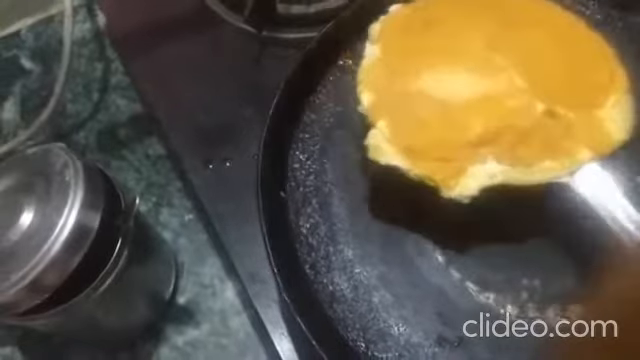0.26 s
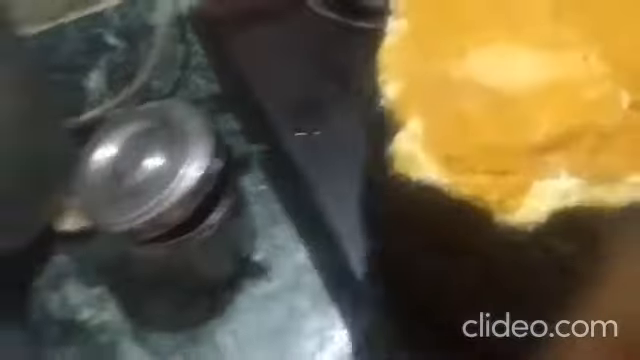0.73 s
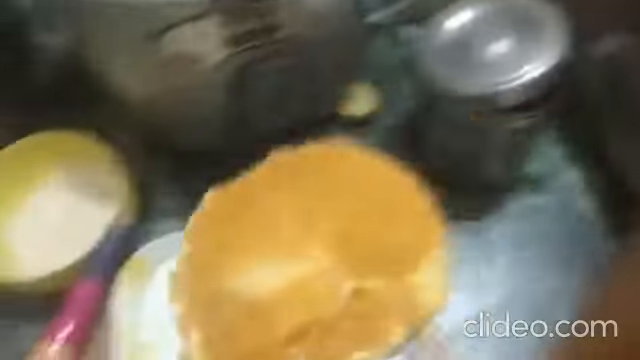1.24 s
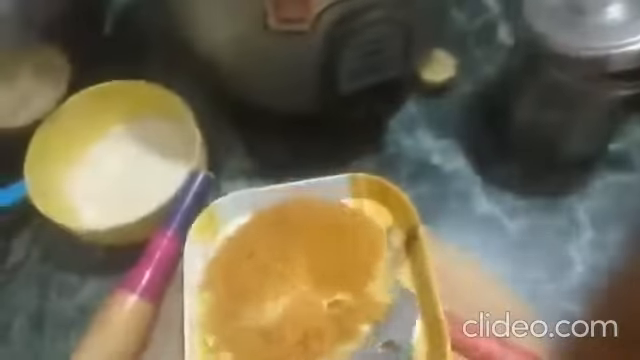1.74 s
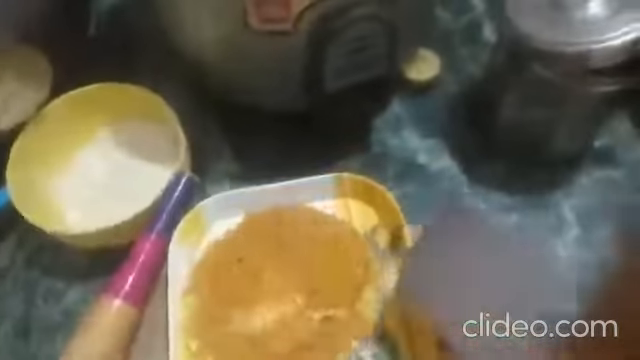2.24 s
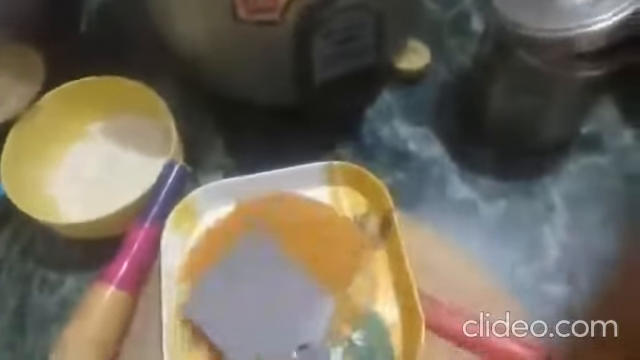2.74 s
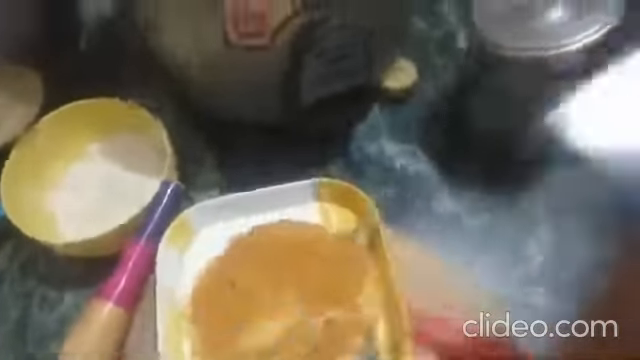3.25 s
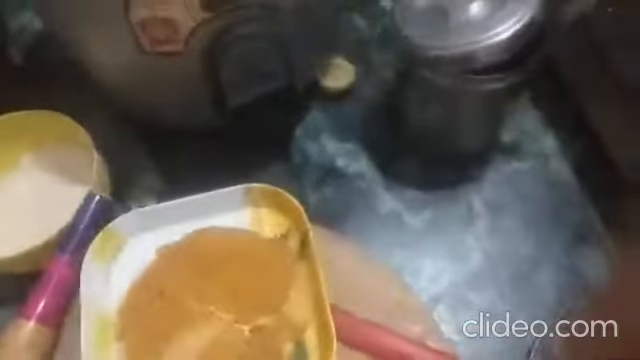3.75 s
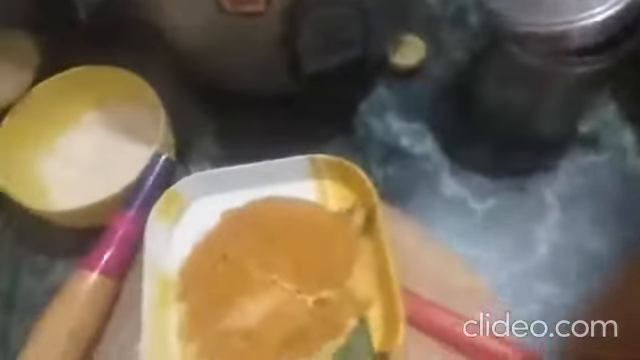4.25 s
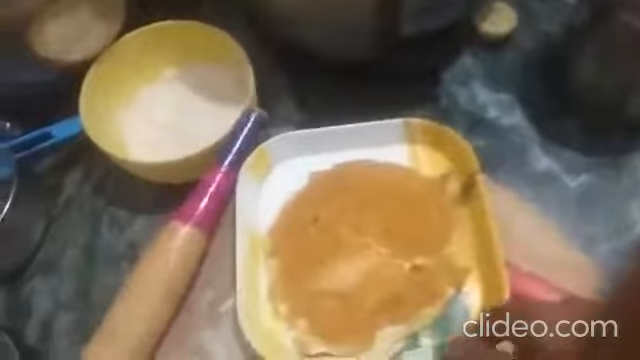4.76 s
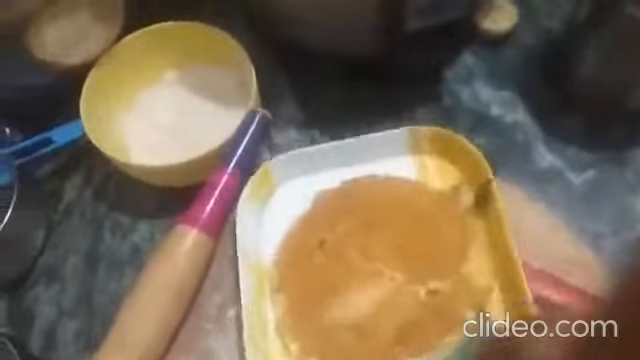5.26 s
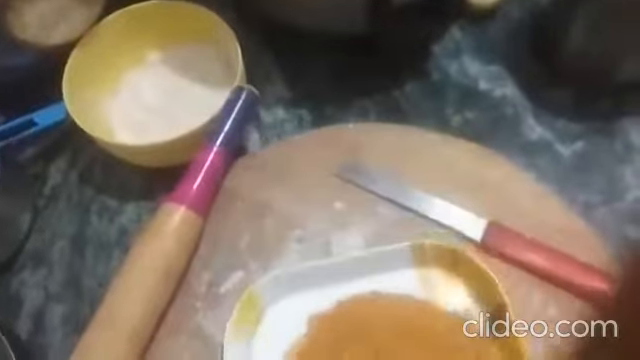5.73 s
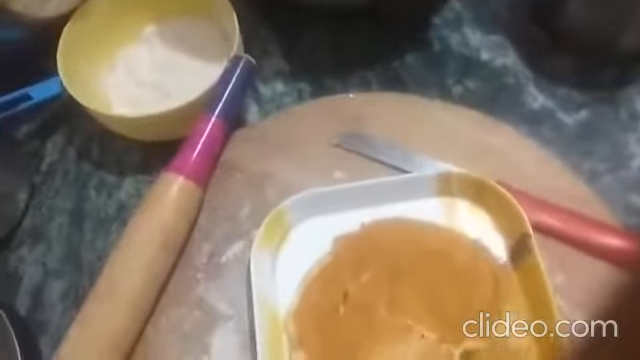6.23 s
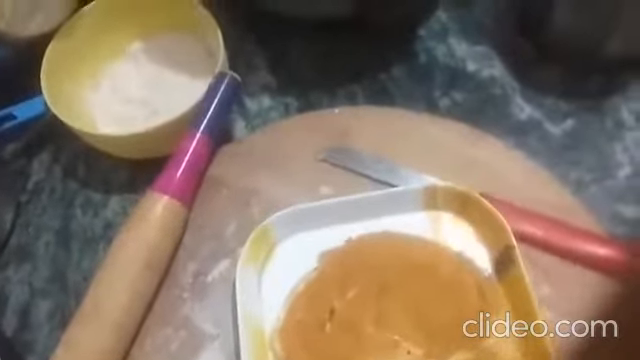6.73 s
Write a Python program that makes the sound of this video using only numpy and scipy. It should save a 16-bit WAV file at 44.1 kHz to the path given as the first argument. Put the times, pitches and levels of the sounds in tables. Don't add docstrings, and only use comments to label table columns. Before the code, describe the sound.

Low rumbling bumps and choppy whooshes of fan noise, opening and closing through a noise suppressor, with a brief fine sizzle at the start. Midway comes a tiny scratchy snap, later a ringing steel clink and a weaker one. After a quiet gap, a plastic plate is lightly tapped, then knocks loudly and dully on a board. Gusty air resumes. Handheld, close, stereo, slightly watery treble, short room echo.

```python
import sys
import numpy as np
from scipy import signal
from scipy.io import wavfile
from scipy.ndimage import uniform_filter1d, minimum_filter1d

SR = 44100
rng = np.random.default_rng(int(sys.argv[2]) if len(sys.argv) > 2 else 0)


def file_out(sig):
    cols = np.atleast_2d(sig).T
    lim = np.clip(cols, -1, 1)
    pcm = np.round(lim * 32767).astype(np.int16)
    wavfile.write(sys.argv[1], SR, pcm)


def volts(x):
    e = np.asarray(x, float) / 20
    return 10 ** e


N = 308252

# pitch_hz, density_db (per Hz)
FAN_COLOUR = [(82, -44), (140, 7.5), (258, -10), (320, 3.5), (422, -16.5), (484, 0.5), (534, -5.5),
              (824, -3.5), (965, -5), (1040, -6), (3080, -4.5), (6260, -5), (11500, -3.5), (14000, -7.5),
              (15500, -9)]
# pitch_hz, width_hz, level_db
ROOM_MODES = [(161, 260, -21.5), (249, 1.7, -7), (316, 30, 2), (504, 59, -16)]
# pitch_hz, density_db (per Hz)
HUSH_COLOUR = [(15, -29), (25, -8), (69, -8.5), (107, 7), (152, -41), (188, -25), (221, -18), (246, -7.5),
               (509, -12), (614, -14.5), (782, -18.5), (970, -14), (5140, -39), (8130, -34.5), (15500, -30)]
HUSH_DB = -55
# pitch_hz, width_hz, level_db
COIL_WHINE = [(7390, 60, -80), (7950, 120, -71), (8085, 130, -69), (8100, 900, -70)]
# pitch_hz, correlation (-1 to 1)
PORT_LIKENESS = [(60, 1), (130, 0.89), (290, 0.85), (640, 0.49), (1410, -0.28), (3100, 0.11), (6820, 0.45),
                 (15000, 0.5)]

# time_s, level_db
AJAR = [(0.0, -58), (0.12, -50), (0.31, -59.5), (0.7, -49.5), (0.88, -53.5), (1.6, -49.5), (2.4, -46.5),
        (2.53, -55.5), (2.7, -40.5), (3.05, -47), (3.2, -47), (3.5, -46.5), (3.9, -60.5), (4.15, -67),
        (5.0, -70), (5.5, -63.5), (5.65, -66.5), (6.99, -42)]
# peak_s, opening_s, closing_s, level_db,
# brightness_db
OPENINGS = [(0.758, 0.03, 0.088, -36, -7), (0.918, 0.0046, 0.12, -38.5, -3),
            (1.097, 0.077, 0.024, -39, 0), (1.149, 0.039, 0.069, -38, -2),
            (1.281, 0.042, 0.051, -39, -11.5), (1.395, 0.0099, 0.028, -40.5, 10),
            (1.43, 0.064, 0.45, -36.5, -8), (1.634, 0.015, 0.2, -41, 8.5),
            (1.743, 0.097, 0.066, -32.5, -2), (1.925, 0.056, 0.12, -34, 0.5),
            (2.059, 0.027, 0.1, -32.5, -2.5), (2.133, 0.032, 0.16, -37, 5),
            (2.183, 0.051, 0.057, -28.5, -7), (2.41, 0.72, 0.099, -46.5, -23),
            (2.633, 0.054, 0.13, -37, -1.5), (2.855, 0.069, 0.17, -34, -2.5),
            (2.969, 0.029, 0.032, -31.5, -7), (3.09, 0.062, 0.051, -50.5, -31),
            (3.294, 0.029, 0.096, -31, 2.5), (3.353, 0.06, 0.058, -34.5, -15.5),
            (3.598, 0.073, 0.08, -40.5, 1), (3.692, 0.025, 0.063, -43.5, 5),
            (3.8, 0.085, 0.11, -45, -12), (0.25, 0.54, 0.9, -56.5, -7),
            (4.791, 0.021, 0.041, -53, -3), (4.951, 0.1, 0.048, -63.5, 3.5),
                 (5.076, 0.033, 0.2, -60.5, -3), (5.2, 0.015, .04, -78, 6), (5.298, 0.042, 0.016, -63, -30),
                 (5.626, 0.058, 0.21, -36.5, -6), (5.744, 0.052, 0.2, -31.5, -6),
                 (5.851, 0.03, 0.051, -36.5, -3.5), (6.007, 0.055, 0.12, -29, -3.5),
                 (6.121, 0.027, 0.071, -37, -12), (6.262, 0.023, 0.072, -51.5, 13),
                 (6.308, 0.044, 0.083, -33.5, 4.5), (6.353, 0.1, 0.081, -37, -22.5),
                 (6.54, 0.02, 0.16, -41.5, -3.5), (6.678, 0.033, 0.058, -36.5, -8),
                 (6.81, 0.031, 0.085, -58, 12), (6.907, 0.073, 0.054, -34, 3)]
REST_BODY_DB, REST_TREBLE_DB, BODY_DB = 7, -2, 2
BODY_LAG_S, TREBLE_LEAD_S = 0.001, 0.004
EDGE_DB = 12
OPEN_SHAPE, BOOM_SHAPE = 1.11, 3
BOOM_LEAK_DB = -10

# peak_s, fading_s, pitch_hz, level_db
BOOMS = [(0.0, 0.068, 109.3, -39), (0.16, 0.09, 96.2, -39.5), (0.33, 0.18, 113.1, -50.5),
         (0.47, 0.17, 97.8, -52.5), (0.99, 0.027, 105.5, -47), (1.32, 0.087, 114.8, -49.5),
         (1.56, 0.094, 107.9, -35), (1.728, 0.14, 108, -37.5), (1.9, 0.059, 119.4, -46),
         (2.061, 0.026, 114, -51), (2.23, 0.15, 115.8, -43.5), (2.47, 0.07, 107.2, -39),
         (2.63, 0.14, 98, -44), (2.799, 0.055, 104, -36), (2.96, 0.17, 110.8, -40.5),
         (3.43, 0.13, 106.8, -36.5), (3.681, 0.052, 101.2, -50.5), (3.859, 0.12, 119.5, -52),
         (4.101, 0.19, 97.3, -53), (4.7, 0.157, 93, -41), (4.921, 0.074, 94, -46.5),
         (5.24, 0.098, 94.9, -59.5), (5.68, 0.046, 120.7, -42), (5.799, 0.14, 103.8, -40.5),
         (5.96, 0.19, 104, -42.5), (6.17, 0.1, 108, -41.5), (6.39, 0.089, 106.8, -34),
         (6.61, 0.11, 104.9, -43), (6.819, 0.15, 104, -43.5)]
# peak_s, fading_s, level_db
THUDS = [(0.1, 0.037, -37.5), (0.22, 0.078, -44), (0.42, 0.28, -49), (0.84, 0.19, -56), (1.06, 0.093, -48),
         (1.46, 0.28, -53), (1.71, .1, -53), (1.93, .05, -46), (2.06, 0.032, -46), (2.35, 0.53, -51),
         (2.76, 0.13, -47), (2.88, 0.31, -42), (3.331, 0.091, -44.5), (4.54, .06, -50), (5.3, 0.066, -52.5),
         (5.8, 0.15, -42), (6.0, 0.1, -56), (6.17, 0.098, -42), (6.369, 0.12, -41.5), (6.56, 0.019, -41),
         (6.7, .07, -37), (6.99, 0.23, -48)]
DEEP_UNDER_DB, UPPER_UNDER_DB = -35, -6
UPPER_HZ = 104
BOOM_RISE = 0.854

# time_s, level_db
SIZZLE = [(0, -52.5), (0.3, -55.5), (0.55, -49), (0.72, -51.5), (0.9, -73), (1.2, -80)]
# peak_s, length_s, pitch_hz, level_db
SWELLS = [(0.26, 0.28, 137, -52.5), (1.28, 0.011, 480, -70), (0.78, 0.057, 133, -44.5),
          (1.421, 0.017, 320, -37.5), (2.165, 0.029, 310, -37), (2.93, 0.11, 207, -40.5),
          (3.6, 0.048, 190, -49), (6.054, 0.066, 316, -46), (7, 0.055, 184, -43)]
# start_s, peak_db, length_s, centre_hz
RUSTLES = [(0.909, -56, 0.0091, 5000), (1.395, -41, 0.021, 9200), (2.624, -31, 0.011, 8100),
           (3.273, -41, 0.013, 8900), (4.44, -54, 0.03, 11400), (4.638, -52, 0.023, 9100),
           (4.769, -55, 0.042, 4030), (4.791, -39, 0.0045, 11170), (5.191, -47.5, 0.06, 8500),
           (6.796, -31.5, 0.015, 9070)]
# peak_db, length_s, centre_hz
TICKS = [(-36, .012, 7900), (-39, .014, 12000), (-26.5, 0.057, 420), (-33, 0.056, 610), (-28, 0.11, 280),
         (-27.5, .1, 680), (-39.5, 0.11, 850), (-26.5, 0.041, 710), (-26, 0.048, 690), (-26, 0.072, 750),
         (-27, 0.073, 185), (-32.5, 0.15, 2100), (-39, .006, 370), (-58, .006, 2200), (-44, 0.0093, 2400),
         (-33, 0.047, 1000), (-35, 0.071, 990)]
TICK_S = [1.388, 1.0, 0.906, 1.39, 6.87, 2.95, 3.08, 5.82, 5.96, 6.28, 6.44, 1.635, 5.256, 5.093, 0.908,
          1.27, 6.08]

# start_s, level_db, dying_s
SNAP = [
    (1.6162, -4, .0011),
    (1.6178, 0, .0012),
    (1.6192, -3, .0010),
    (1.6203, -9, .0016),
    (1.6281, -8, .0006),
]
# pitch_hz, width_hz, level_db
EDGE = [(2250, 160, -7.5), (6000, 150, -5.5), (7900, 94, -3), (10200, 127, -2), (11400, 155, -2),
        (13600, 250, -8), (3080, 45, -12.5)]
SNAP_DB = -9
# start_s, peak_db, crack_db, length_factor, brightness_db (per octave)
CLINKS = [
    (3.552, -17.5, 3.5, 0.7, 1.5),
    (3.759, -27, 2.5, 1, 2),
]
STEEL_HZ = [684, 944, 1530, 2007, 2150, 2247, 2610, 2950, 3270, 3467, 4200, 4394, 4540, 5250, 5860, 6430,
            7892, 10100, 11090, 11350]
# level_db, t60_s
STEEL = [(-5, 0.29), (4, 0.42), (-16, 0.44), (-7, 0.65), (7, 0.089), (3.5, 0.16), (-16, 1), (-16, 0.28),
         (-18, 0.46), (-10, 0.32), (-5.5, .45), (-3.5, 0.2), (-7, 0.22), (-18, 0.37), (-10, 0.41),
         (-15, 0.36), (5, 0.13), (-0.5, 0.16), (-7.5, 0.28), (-9, 0.27)]
REST_HZ = [684, 937, 978, 1522, 1653, 1986, 2610, 2735, 3268, 3510, 3902, 4093, 4538, 5250]
# level_db, t60_s
REST = [(2, 0.23), (9.5, 0.12), (7, 0.14), (-11, 0.36), (-6.5, 0.95), (-11, 0.49), (-7, 0.21), (-6, 0.22),
        (-9, .12), (-9, 0.37), (-6, 0.19), (-10, 0.29), (-8.5, 0.24), (-13, 0.5)]
GRIP_S = [0.15, .105]

# start_s, peak_db, pitch_factor, rattle (0 to 1)
KNOCKS = [
    (4.998, -34, 1.08, 0.55),
    (5.066, -42.5, 1.2, 0.2),
    (5.114, -30, 0.98, 0.32),
    (5.256, -45, 1.06, 0),
    (5.502, -4.5, 0.99, 0.55),
]
# pitch_hz, level_db, t60_s
PLATE = [(563, -25, 0.085), (787, -9.5, 0.037), (987, 1, 0.023), (1590, 4.5, 0.21), (1990, -8, 0.082),
         (2420, 2, 0.017), (3340, -24, 0.03), (4650, -23, 0.047)]
# pitch_hz, level_db, t60_s
RIM = [(465, -9, 0.08), (573, -7.5, 0.05), (694, 9.5, 0.016), (923, -8, 0.041), (1490, -5, 0.02),
       (2250, -12, 0.027), (2910, -9.5, 0.018)]
BOUNCE_S = .0078
# delay_s, level_db
SETTLE = [(.0105, -23), (.0195, -21), (.028, -27), (.0325, -21), (.040, -23), (.046, -29)]
# pitch_hz, t60_s
KITCHEN = [(200, 1), (1000, 0.21), (4000, 0.26), (12000, 0.06)]

# pitch_hz, share
STARVE_MID = [(2500, 0), (3500, .14), (5000, .38), (6500, .4), (7500, .28), (9000, .32), (10500, .15),
              (12000, .18), (13500, .35), (14500, .6), (15150, 1.1)]
# pitch_hz, share
STARVE_SIDE = [(4300, 0), (4900, .45), (6500, .68), (14500, .72), (15100, 1.1)]
# start_s, length_s
MASKED = [(1.64, .02), (3.575, .09)]
MASK_DB = -3.5
COARSE_DB = -1
# centre_s, half_length_s
DROPOUT = (3.546, 0.0028)


def evened(x):
    return x / np.sqrt(np.mean(x ** 2) + 1e-20)


def read(points, hz):
    f, value = np.transpose(points)
    return np.interp(np.log(hz + 1), np.log(f + 1), value)


def add(mix, s, sound):
    part = mix[round(s * SR):][:len(sound)]
    part += sound[:len(part)]


def resonate(x, hz, width):
    turn = np.exp(2j * np.pi * np.cumsum(hz * np.ones(x.shape[-1])) / SR)
    r = np.exp(-np.pi * width / SR)
    return 2 * (turn * signal.lfilter([1 - r], [1, -r], x / turn)).real


def humps(t, s, rise, fall, db, shape):
    u = t - s[:, None]
    span = np.where(u < 0, rise[:, None], fall[:, None])
    return volts(2 * (db[:, None] - EDGE_DB * abs(u / span) ** shape))


def airy(field_db, patchy_db):
    frames, hz = N // 128 + 5, np.fft.rfftfreq(512, 1 / SR)
    a, b, c, d, patches = rng.standard_normal((frames, 257, 5)).T
    patches = uniform_filter1d(patches, size=6, axis=0)
    patches = evened(uniform_filter1d(patches, size=16, axis=1))
    same = np.clip(read(PORT_LIKENESS, hz), -1, 1)[:, None]
    left = a + 1j * b
    right = same * left + np.sqrt(1 - same ** 2) * (c + 1j * d)
    z = np.array([left, right])
    z *= volts(field_db(hz, np.arange(frames) * 128 / SR) + patchy_db * patches)
    return signal.istft(z, nperseg=512, noverlap=384)[1][:, :N]


def burst(length):
    u = np.arange(round(.2 * SR)) / SR / length
    return rng.standard_normal(len(u)) * (1 - np.exp(-8 * u)) * np.exp(-1.5 * u ** 2)


def ring(modes, length, tune, tilt_db, rise, rough):
    t = np.arange(round(.6 * SR)) / SR
    noise = rng.standard_normal((len(modes), len(t)))
    flutter = 1 + rough * evened(uniform_filter1d(noise, size=500))
    x = np.zeros(len(t))
    for (hz, db, t60), f in zip(modes, flutter):
        level_db = db + tilt_db * np.log2(hz / 2000) - 60 * t / (t60 * length)
        x += volts(level_db) * np.sin(2 * np.pi * hz * tune * t) * f
    x = x * (1 - np.exp(-t / rise))
    return x / abs(x).max()


def fan():
    s, rise, fall, db, tilt_db = np.transpose(OPENINGS)
    boom_s, fade, _, boom_db = np.transpose(BOOMS)
    centres = np.log([350, 1800, 8500])  # body, middle and treble (Hz)
    bands = [(-0.5, BODY_LAG_S, BODY_DB, REST_BODY_DB),
             (-0.18, 0.00056, 0, 0.011),
             (0.92, -TREBLE_LEAD_S, 0.00039, REST_TREBLE_DB)]

    def field(hz, t):
        colour = read(FAN_COLOUR, hz) - 40 * (hz < 110)
        share = [np.interp(np.log(hz + 1), centres, row) for row in np.eye(3)]
        rest_db = np.interp(t, *np.transpose(AJAR))
        powers = []
        for k, lag, offset, rest in bands:
            opened = humps(t - lag, s, rise, fall, db + k * tilt_db + offset, OPEN_SHAPE).sum(0)
            powers.append(volts(2 * (rest_db + rest)) + opened)
        leak = humps(t, boom_s, BOOM_RISE * fade, fade, boom_db + BOOM_LEAK_DB, BOOM_SHAPE)
        powers[0] = powers[0] + leak.sum(0)
        lift_db = (-6, -2, -3)
        lifts = [w[:, None] * (10 * np.log10(p) + o) for w, p, o in zip(share, powers, lift_db)]
        return colour[:, None] + sum(lifts)

    air = airy(field, 2.4) * volts(-10.5)
    return air + sum(volts(db) * resonate(air, hz, w) for hz, w, db in ROOM_MODES)


def boom():
    t, slow = np.arange(N) / SR, np.arange(0, N, 128) / SR
    rest_db = np.interp(slow, *np.transpose(AJAR))
    s, fall, hz, db = np.transpose(BOOMS)
    each = humps(slow, s, BOOM_RISE * fall, fall, db, BOOM_SHAPE)
    rest = volts(2 * (rest_db + UPPER_UNDER_DB))
    power = each.sum(0) + rest
    pitch = (hz @ each + UPPER_HZ * rest) / power
    s, fall, db = np.transpose(THUDS)
    thuds = humps(slow, s, BOOM_RISE * fall, fall, db, BOOM_SHAPE).sum(0)
    deep_power = thuds + volts(2 * (rest_db + DEEP_UNDER_DB))
    shake = uniform_filter1d(rng.standard_normal((4, N)), size=900)
    shake = evened(uniform_filter1d(shake, size=900))
    ports = np.array([[1], [-1]])
    deep_phase = 2 * np.pi * np.cumsum(55 + 11 * shake[0]) / SR
    deep = np.sin(deep_phase + 0.43 * shake[2] * ports)
    upper_phase = 2 * np.pi * np.cumsum(np.interp(t, slow, pitch) + 4 * shake[1]) / SR
    upper = np.sin(upper_phase + 0.11 * shake[3] * ports)
    deep = deep * np.interp(t, slow, np.sqrt(deep_power))
    upper = upper * np.interp(t, slow, np.sqrt(power))
    return 0.8 * (deep + upper)


def hush_and_coil():
    hush = volts(HUSH_DB) * evened(airy(lambda hz, t: read(HUSH_COLOUR, hz)[:, None], 2.6))
    hiss = rng.standard_normal(N)
    whine = np.zeros(N)
    for k, (hz, width, db) in enumerate(COIL_WHINE):
        shifted = np.roll(hiss, shift=9000 * k)
        whine += volts(db) * evened(resonate(resonate(shifted, hz, width), hz, width))
    return hush + whine


def sizzle():
    crackle_db = 1.5 * rng.exponential(1, N // 64 + 1).repeat(64)[:N]
    fizz = rng.standard_normal(N) * volts(crackle_db)
    band = signal.butter(2, (8900, 13200), "band", fs=SR, output="sos")
    fizz = signal.sosfilt(band, fizz)
    return volts(np.interp(np.arange(N) / SR, *np.transpose(SIZZLE))) * evened(fizz)


def swells():
    out, t = np.zeros(N), np.arange(SR // 2) / SR - 1 / 4
    for s, length, hz, db in SWELLS:
        rumble = evened(resonate(rng.standard_normal(len(t)), hz, hz / 12))
        add(out, s - 1 / 4, volts(db) * np.exp(-(t / length) ** 2) * rumble)
    return out


def rustles(rows):
    out = np.zeros(N)
    for s, db, length, hz in rows:
        add(out, s, volts(db) * resonate(burst(length), hz, min(hz, 3700)))
    return out


def snap():
    t = SNAP[0][0] + np.arange(round(.2 * SR)) / SR
    skips = sum(volts(db) * (t > s) * np.exp(-abs(t - s) / dying) for s, db, dying in SNAP)
    scratch = rng.standard_normal(len(t)) * skips
    edge = np.zeros(len(t))
    for hz, w, db in EDGE:
        edge += volts(db) * evened(resonate(resonate(scratch, hz, 4 * w), hz, 4 * w + 600))
    edge = edge + 0.35 * evened(np.diff(scratch, prepend=0))
    edge = edge + 0.49 * evened(resonate(scratch, 4200, 2400))
    return volts(SNAP_DB) * edge / abs(edge).max()


def spatula():
    out = np.zeros(N)
    add(out, SNAP[0][0], snap())
    strikes = zip(CLINKS, (STEEL_HZ, REST_HZ), (STEEL, REST), GRIP_S)
    for (s, db, crack_db, length, tilt_db), pitches, rows, grip in strikes:
        first = rows is STEEL
        rise = .003 if first else .007
        modes = [(hz, *row) for hz, row in zip(pitches, rows)]
        chatter = np.diff(burst(0.015))
        chatter = chatter * np.minimum(np.arange(len(chatter)) / SR / rise, 1)
        rasp = volts(0 if first else -16) * 0.18 * chatter
        rasp = rasp + sum(volts(g + 13.0) * resonate(chatter, hz, 222) for hz, g, _ in modes)
        rung = ring(modes, length, 1, tilt_db, .005 if first else .007, .22)
        age = np.arange(len(rung)) / SR
        rung = rung * (.15 + .85 / (1 + (age / grip) ** 12))
        add(out, s + .003 * first, volts(db - 4) * rung)
        add(out, s - .001, volts(db + crack_db) * rasp / abs(rasp).max())
    return out


def plate():
    out = np.zeros(N)
    band = signal.butter(2, (450, 3300), "band", fs=SR, output="sos")
    for s, db, tune, rattle in KNOCKS:
        hard = db > -20
        modes, rise, rough = (PLATE, .0003, .05) if hard else (RIM, .0012, .3)
        hit = volts(db) * ring(modes, 0.76, tune, 0, rise, rough)
        if hard:
            choke = np.exp(-(np.arange(len(hit)) / SR / 0.0051) ** 3)
            hit = -signal.sosfilt(band, hit * choke)
            for later, less_db in SETTLE:
                add(out, s + later, volts(less_db) * resonate(hit, 1560, 700))
        else:
            add(out, s + BOUNCE_S, -rattle * hit)
        add(out, s + 0.00039, hit)
    return out


def kitchen(x):
    taps = np.zeros((2, SR // 2))
    at = np.arange(300, SR // 2 - 20, 20)
    at = at + rng.integers(0, 20, (2, len(at)))
    np.put_along_axis(taps, at, rng.choice([-1., 1.], at.shape), 1)
    hz, t, z = signal.stft(taps, SR, nperseg=256)
    decay = volts(-60 * t / read(KITCHEN, hz)[:, None])
    tail = signal.istft(z * decay, SR, nperseg=256)[1]
    return signal.fftconvolve(x[None], tail / np.linalg.norm(tail[0]), axes=1)[:, :N]


def starve(x):
    mid_side = np.array([x[0] + x[1], x[0] - x[1]]) / 2
    hz, t, z = signal.stft(mid_side, SR, "cosine", nperseg=2048)
    luck = np.repeat(rng.standard_normal((2, 129, len(t))), 8, axis=1)[:, :len(hz)]
    wide = np.repeat(luck[1, ::8], 32, axis=0)[:len(hz)]
    wide = evened(uniform_filter1d(wide, size=2))
    narrow = uniform_filter1d(luck[0], size=2)
    narrow = evened(uniform_filter1d(narrow, size=11, axis=0))
    luck = 1 / (1 + np.exp(-1.7 * np.array([narrow, wide])))
    share = np.array([read(STARVE_MID, hz), read(STARVE_SIDE, hz)])[..., None]

    bright = uniform_filter1d(np.diff(x[0]) ** 2, size=128)
    jump = bright / (uniform_filter1d(bright, size=1024, origin=511) + 1e-12)
    sharp = -minimum_filter1d(-1. * (jump > 7.5) * (bright > 6e-4), size=300)
    attack = np.interp(t * SR, np.arange(N - 1), uniform_filter1d(sharp, size=1400)) > 1e-6

    power = abs(z) ** 2
    around = uniform_filter1d(power, size=70, axis=1)
    masked = np.any([(t > s) & (t < s + length) for s, length in MASKED], 0)
    weak = uniform_filter1d(power, size=9, axis=1) < volts(2 * MASK_DB) * around
    weak &= (hz > 2700)[:, None] & masked
    coarse = power < volts(2 * COARSE_DB) * uniform_filter1d(power, size=40, axis=1)
    weak |= coarse & (luck < 2.2 * share) & (hz > 3800)[:, None]
    mid_only = np.array([True, False])[:, None, None]
    strong = (power > 5 * around) & (hz < 14000)[:, None] & mid_only
    kept = ((luck > share) & ~weak) | strong | (attack & (hz < 15100)[:, None])

    band = signal.butter(6, (15100, 15900), "band", fs=SR, output="sos")
    top = signal.sosfiltfilt(band, x) * uniform_filter1d(np.append(sharp, 0), size=100)
    mid, side = signal.istft(z * kept, SR, "cosine", nperseg=2048)[1][:, :N]
    return np.array([mid + side, mid - side]) + top / 2


def scene():
    steel, plastic = spatula(), plate() + rustles(RUSTLES)
    near = steel + plastic
    shade = np.roll(plastic - steel, shift=2)
    shade = resonate(resonate(shade, 3600, 2200), 3600, 2200)
    side = 0.9 * shade + .3 * np.gradient(steel)
    direct = np.array([near + side, near - side])
    echo = kitchen(volts(-6.0) * steel + volts(-13.5) * plastic)
    ticks = rustles([(s, *row) for s, row in zip(TICK_S, TICKS)])
    return direct + echo + fan() + boom() + swells() + hush_and_coil() + ticks + sizzle()


def roll_off(x):
    return signal.sosfilt(signal.butter(12, 16340, fs=SR, output="sos"), x)


def record(dry):
    t = np.arange(N) / SR
    gap = 1 - np.exp(-((t - DROPOUT[0]) / DROPOUT[1]) ** 2)
    ports = volts(np.array([[-.3], [.3]]))
    return roll_off(starve(dry * gap * ports))


dry = scene()
out = record(dry)
file_out(out)
```